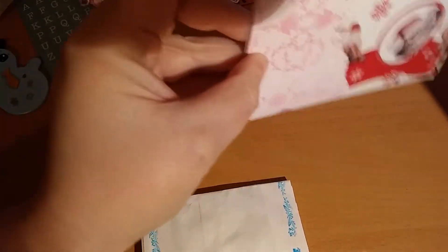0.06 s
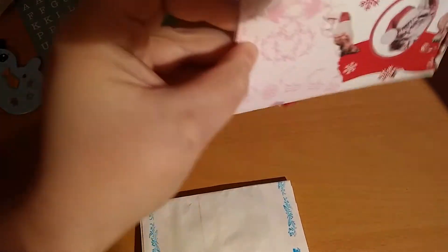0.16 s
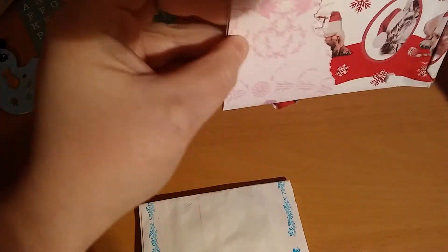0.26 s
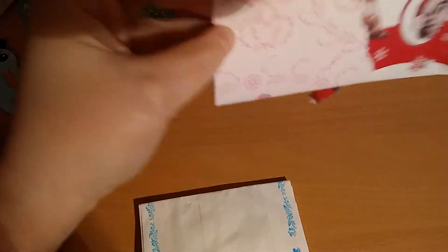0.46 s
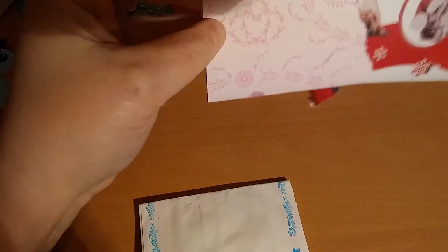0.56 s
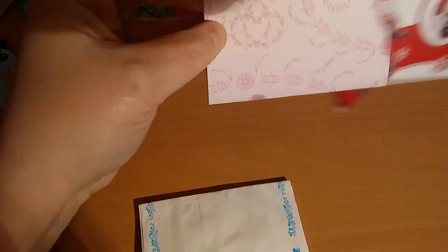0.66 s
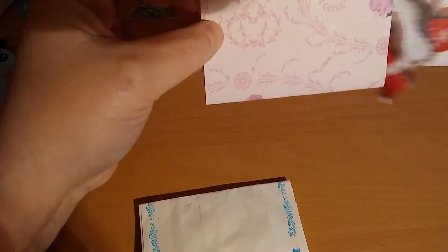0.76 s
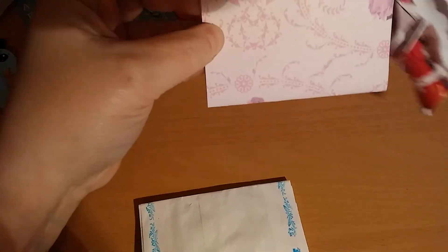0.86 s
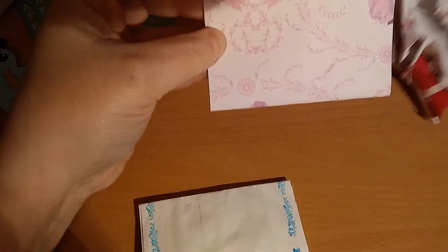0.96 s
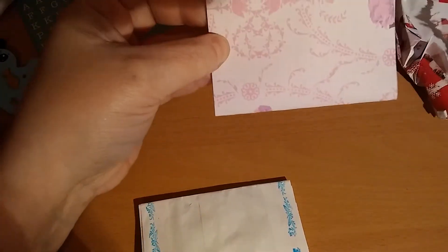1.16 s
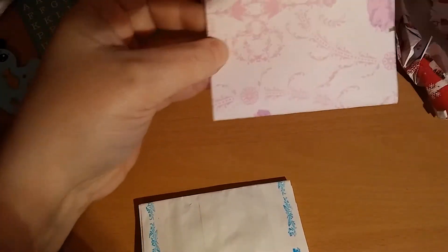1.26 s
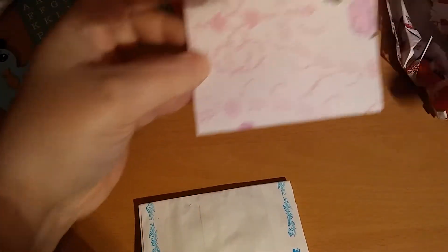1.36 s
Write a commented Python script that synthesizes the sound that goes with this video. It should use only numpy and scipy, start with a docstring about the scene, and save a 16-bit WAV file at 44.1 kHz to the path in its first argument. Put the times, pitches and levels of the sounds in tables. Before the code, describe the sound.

Hands strip wrapping paper from a small card box at a table: a brief crackle, sharp snaps, a longer hissing rustle, then loud cracks with hollow knocks, close to a camera microphone in a quiet room.

```python
"""Paper slides, crackles and rubs a small card box as hands tear the wrapping off, close to a camera microphone.
Clumped random slips, each rattling on in the sheet, are filtered into hiss, crackle and box rubbing.
Creases snap as a crack with a dying volley; hands knock box and table as short decaying sines.
Quiet room noise lies behind; between bursts all sound drops away abruptly."""
import sys
import numpy as np
from scipy import signal
from scipy.io import wavfile
from scipy.ndimage import uniform_filter1d

SR = 44100
rng = np.random.default_rng(int(sys.argv[2]) if len(sys.argv) > 2 else 0)


def transcribe(u):
    """Save the signal u as a 16-bit wav file named by the first command-line argument.

    u: samples, shape (n,) or (channels, n), limited to [-1, 1]; the rate is SR.
    q: integer samples, one column per channel.
    """
    v = np.clip(np.atleast_2d(u).T, -1, 1)
    q = np.round(v * 32767).astype(np.int16)
    wavfile.write(sys.argv[1], SR, q)


N = 61739

# level curves, one list per burst of handling: time_s, hiss_db, crackle_db, rub_db
BURST_CURVES = [
    [(0, -44.5, -34, -64), (.008, -63, -47.5, -48), (.022, -66, -51, -56), (.034, -68.5, -54, -52.5),
     (.047, -67, -57.5, -60)],
    [(0.092, -80.5, -52, -51.5), (0.106, -57, -60.5, -59), (0.116, -63, -49, -51.5)],
    [(.192, -73, -62, -55.5), (.21, -62, -46, -46), (.226, -58, -49, -46.5), (.236, -63, -52.5, -50),
     (.248, -61, -49, -44.5), (.258, -68, -56, -52), (.273, -68, -59, -54)],
    [(0.285, -72, -62, -67), (0.295, -76, -73, -56), (0.301, -73, -80, -73), (0.315, -57, -61, -62),
     (0.321, -57, -53.5, -60)],
    [(0.342, -54.5, -56.5, -65), (0.366, -50.5, -52, -54), (0.384, -49, -49, -59), (0.397, -40, -41, -61),
     (0.403, -38, -40.5, -55), (0.412, -44, -40.5, -58.5), (0.454, -39.5, -42.5, -54.5),
     (0.474, -40, -37.5, -52.5), (0.492, -39.5, -45.5, -59.5), (0.514, -44.5, -43, -62),
     (0.53, -51, -50.5, -65), (0.574, -73, -64.5, -57.5), (0.596, -47, -48.5, -48),
     (0.612, -50, -48.5, -49.5), (0.65, -63, -52.5, -47), (0.656, -54, -52, -50), (0.666, -49, -49, -51),
     (0.678, -45, -46.5, -56), (0.698, -43.5, -47, -57), (0.708, -43.5, -48.5, -48.5),
     (0.72, -43, -46.5, -51.5), (0.74, -39, -43, -47.5), (0.77, -43, -47, -52), (0.797, -42.5, -47.5, -54),
     (0.814, -46, -43.5, -61.5), (0.824, -45, -42, -55.5), (0.838, -58, -54.5, -52.5),
     (0.878, -57.5, -51, -67.5), (0.892, -59, -57.5, -74)],
    [(1.018, -67, -73, -59.5), (1.026, -37.5, -53, -70), (1.034, -63, -61.5, -63),
     (1.04, -46.5, -63, -42.5), (1.052, -59.5, -46.5, -46.5), (1.069, -49, -48, -49.5),
     (1.08, -56, -54.5, -47.5), (1.092, -47, -55, -55), (1.103, -61.5, -53, -51), (1.112, -43.5, -64, -57),
     (1.122, -58, -56, -58), (1.14, -60.5, -37.5, -42.5), (1.165, -62.5, -55, -45.5),
     (1.194, -63, -51, -63)],
    [(1.314, -74, -88, -71.5), (1.335, -94, -82, -82), (1.34, -85, -84, -79), (1.346, -81, -74.5, -71),
     (1.355, -72, -76, -76)],
]


def gain_of(db):
    """Amplitude factor of a level in dB."""
    return 10 ** (np.asarray(db) / 20)


def evened(x):
    """Scale to unit RMS."""
    return x / np.sqrt(np.mean(x ** 2) + 1e-20)


def colour(x, points):
    """Causal minimum-phase filter through the given (hz, db) points."""
    hz, db = np.transpose(points)
    bin_hz = abs(np.fft.fftfreq(4096, 1 / SR))
    bin_db = np.interp(np.log(bin_hz + 1), np.log(hz + 1), db)
    log_gain = bin_db * np.log(10) / 20
    spectrum = np.exp(np.conj(signal.hilbert(log_gain)))
    taps = np.fft.ifft(spectrum).real[:2048]
    return signal.oaconvolve(x, taps)[:len(x)]


def ring(x, hz, width_hz):
    """One two-pole resonance of about unit peak gain."""
    r = np.exp(-np.pi * width_hz / SR)
    edge = (1 - r * r) / 2
    return signal.lfilter([edge, 0, -edge], [1, -2 * r * np.cos(2 * np.pi * hz / SR), r * r], x)


def handling():
    """Paper slides with a hiss, crackles, and rubs the box, each slip train on its own level curve."""
    # sliding spectrum: hz, level_db
    hiss_spectrum = [(500, -52), (2500, -27.5), (4200, -9), (5450, -1), (6800, -4), (8000, -19),
                     (10300, -24), (11800, -37), (16000, -46)]
    # crackle spectrum: hz, level_db
    crackle_spectrum = [(300, -24.5), (700, -13), (1050, -9.5), (1460, -7.5), (1900, -3), (2230, 4.5),
                        (2500, -1.5), (3400, 1.5), (4400, 0), (7000, -18.5), (16000, -64.5)]
    hiss = colour(grains(14000, spread_db=2.2, clump_db=1.3, clump_s=0.0012), hiss_spectrum)
    crackle = colour(grains(6000, spread_db=2.5, clump_db=1.4, clump_s=0.0027), crackle_spectrum)
    rub = box(grains(900, spread_db=1.0, clump_db=2.2, clump_s=0.004))

    t = np.arange(N) / SR
    time_s, *levels_db = np.concatenate(BURST_CURVES).T
    total = np.zeros(N)
    for voice, level_db in zip([hiss, crackle, rub], levels_db):
        total += evened(voice) * gain_of(np.interp(t, time_s, level_db))
    return total


def grains(per_s, spread_db, clump_db, clump_s):
    """Tiny slips of uneven size come in clumps; eight patches of sheet each rattle on in their own way."""
    rattle_t60_s, rattle_db = 0.027, 1  # rattle energy relative to its slip
    span = max(round(clump_s * SR), 2)
    slow = uniform_filter1d(uniform_filter1d(rng.standard_normal(N), span), span)
    size = np.minimum(rng.exponential(1, N), 4)
    size_gain = gain_of(spread_db * size + clump_db * evened(slow))
    happens = rng.random(N) < per_s / SR
    slips = happens * rng.standard_normal(N) * size_gain

    # the slipping patch is drawn anew every 64 samples
    patch = rng.integers(0, 8, N // 64 + 1)[np.arange(N) // 64]
    t = np.arange(1500) / SR
    rattles = rng.standard_normal((8, len(t))) * gain_of(-60 * t / rattle_t60_s)
    rattles *= gain_of(rattle_db) / np.linalg.norm(rattles, axis=1, keepdims=True)
    total = slips.copy()
    for k, rattle in enumerate(rattles):
        total += signal.oaconvolve(slips * (patch == k), rattle)[:N]
    return total


def box(x):
    """The hollow card box rings low: parallel modes of alternating sign, then an overall spectrum."""
    # resonances of the box: pitch_hz, width_hz, level_db
    box_modes = [(85, 20, -18.5), (192.4, 60, -1.5), (300, 77.4, -6), (420, 48, 0), (704, 44, -9),
                 (990, 305, -9)]
    # overall spectrum of the box: hz, level_db
    box_spectrum = [(20, -28.5), (70, 2), (150, -0.5), (1200, 1), (3000, -18), (16000, -76)]
    total = np.zeros(len(x))
    for k, (hz, width_hz, db) in enumerate(box_modes):
        total += (-1) ** k * gain_of(db) * ring(x, hz, width_hz)
    return colour(total, box_spectrum)


def snap(peak_db, hz, broad_db, hold_s, t60_s):
    """One sharp crack and a dying volley of smaller ones ring a patch of sheet and sound broadly."""
    # broad crack spectrum: hz, level_db
    crack_spectrum = [(290, -28), (500, -10), (1420, -8), (2260, -1), (2850, -6.5), (3750, -6),
                      (6330, -10.5), (7420, -28), (16000, -55.5)]
    first_db = 18.5  # first crack over the volley
    volley_rise_s, onset_s = 0.00031, 0.0002
    width_hz = 0.38 * hz
    t = np.arange(3000) / SR
    first = 1.0 * (t == 0)

    decay = gain_of(-60 * np.maximum(t - hold_s, 0) / t60_s)
    shape = np.minimum(t / volley_rise_s, 1) * decay
    volley = gain_of(first_db) * first + shape * rng.standard_normal(len(t))

    patch = ring(ring(first, hz, width_hz), hz, width_hz)
    voice = evened(patch) + gain_of(broad_db) * evened(colour(first, crack_spectrum))
    voice *= np.minimum((t + 1 / SR) / onset_s, 1)
    crack = signal.oaconvolve(volley, voice)[:len(t)]
    return gain_of(peak_db) * crack / abs(crack).max()


def bump(level_db, hz, cycles):
    """A soft push on box or table: a sine swells over one cycle, then falls 20 dB in the given cycles."""
    turns = np.arange(3000) / SR * hz
    decay = gain_of(-20 * np.maximum(turns - 1, 0) / cycles)
    swing = np.sin(2 * np.pi * turns) * np.minimum(turns, 1) * decay
    return gain_of(level_db) * swing


def room():
    """Coloured noise of the quiet room, plus a constant negative offset."""
    # room spectrum: hz, level_db
    room_spectrum = [(30, -23.5), (70, -2.5), (250, -3.5), (650, -11), (960, -8.5), (1250, -13.5),
                     (3140, -14.5), (5500, -17.5), (8300, -27), (16000, -27)]
    room_db, offset_db = -66, -70.5
    noise = evened(colour(rng.standard_normal(N), room_spectrum))
    return gain_of(room_db) * noise - gain_of(offset_db)


def presence():
    """Gains for room and handling: full in a burst, swelling in before it and cut short after it."""
    swell_db_per_s, cut_db_per_s = 1689, 8992
    room_floor_db = -9  # the room drops no further; handling has no floor
    t = np.arange(N) / SR
    db = np.full(N, -np.inf)
    for rows in BURST_CURVES:
        early_s = np.maximum(rows[0][0] - t, 0)
        late_s = np.maximum(t - rows[-1][0], 0)
        db = np.maximum(db, -swell_db_per_s * early_s - cut_db_per_s * late_s)
    return gain_of(np.maximum(db, room_floor_db)), gain_of(db)


def scene():
    """Snaps, bumps and handling under one burst gain, the room under its own."""
    # creases snapping, before the burst gain: start_s, peak_db, pitch_hz, broad_db (re patch ring), hold_s, t60_s
    snap_events = [(.012, -30, 2658, 13, 0.0065, 0.015), (0.03, -42, 6640, 2, 0.00072, 0.011),
                   (0.099, -39, 2930, 4, 0.00089, 0.033), (0.1965, -28.5, 3120, 7, 0.0023, 0.014),
                   (0.2045, -19, 5000, 1.5, 0.00091, 0.0099), (0.2067, -23, 2900, 10, 0.0018, 0.029),
                   (0.2128, -23.5, 1520, 9, 0.0016, .012), (0.2197, -18.5, 4850, 2.5, 0.0011, 0.012),
                   (0.261, -39.5, 1800, -3.5, 0.004, 0.028), (0.31, -48, 2170, -17, 0.0072, 0.018),
                   (0.348, -44, 2220, -8, .0012, .025), (0.368, -40.5, 2310, -7, 0.0017, 0.027),
                   (0.3993, -22, 2660, -2.5, 0.0016, 0.019), (0.417, -26.5, 4500, -10, 0.00057, 0.008),
                   (0.435, -31, 4060, -21, 0.002, 0.021), (.469, -29.5, 3100, -26, 0.00276, 0.0091),
                   (0.544, -39.5, 4070, 4, 0.0011, 0.013), (0.581, -57, 3000, 3, .0012, .02),
                   (0.593, -29.5, 2970, -19.5, 0.0066, 0.065), (0.621, -32.5, 2750, -22, 0.0017, 0.021),
                   (0.6349, -33.5, 1340, 3.5, 0.0021, 0.016), (0.6448, -31, 915, -0.5, 0.00074, 0.02),
                   (0.6654, -28.5, 2230, -10, 0.00031, 0.012), (0.7112, -24.5, 3040, -2, .0012, 0.015),
                   (0.7166, -21, 4850, -10.5, 0.00165, 0.013), (0.7926, -34, 4900, -11, 0.0044, .02),
                   (.8232, -25.5, 5166, -9.5, 0.00043, 0.0124), (0.8235, -36, 8810, -10.5, 0.00061, 0.0151),
                   (1.0413, -27, 1270, -8, 0.0011, 0.01), (1.0428, -14, 2767, 5, 0.0013, 0.021),
                   (1.1241, -17, 2800, -14, 0.0013, 0.012), (1.1243, -31, 7540, -20.5, 0.0026, 0.0116),
                   (1.1245, -38.5, 10600, -17, 0.0012, 0.01), (1.1267, -14.5, 2450, -15.5, 0.00083, 0.013),
                   (1.1289, -20.5, 4130, -6.5, 0.0012, 0.01), (1.1303, -17.5, 3742, -26, 0.0007, 0.017),
                   (1.1348, -21, 4470, 2.5, 0.0014, 0.02937), (1.1537, -29.5, 4720, 2, 0.0019, 0.051),
                   (1.191, -45, 4650, -2, 0.00124, 0.0105)]
    # knocks of the hands, before the burst gain: start_s, level_db, pitch_hz, cycles (per 20 dB fall)
    bump_events = [(0.011, -57, 185, 8), (0.199, -56.5, 65.4, 4.5), (0.46, -50.5, 182, 4),
                   (0.506, -56, 151, 2.5), (0.736, -56.5, 76, 0.5), (0.097, -48.5, 350, 1.5),
                   (0.203, -34.5, 420, 6), (0.209, -36, 185, 2), (.243, -37.5, 420, 4.5),
                   (0.262, -39.5, 523, 2.5), (0.377, -46.5, 85, 2), (0.4, -41, 785, 9),
                   (0.451, -52, 84, 2.5), (0.554, -56, 85, 1.5), (.595, -38, 400, 3),
                   (0.604, -45.5, 193, 2), (0.663, -38.5, 420, 2.5), (.71, -37.5, 431, 7),
                   (0.711, -44.5, 138, 1), (1.043, -33, 450, 2), (1.044, -35, 200, 0.5),
                   (1.043, -32, 900, 6), (1.135, -30, 400, 2), (1.136, -34, 240, 2), (1.163, -43.5, 85, 3),
                   (1.313, -53.5, 152, 2), (1.325, -51.5, 90, 2), (1.349, -46.5, 300, 1.5)]
    hits = np.zeros(N + 3000)
    for make, events in [(snap, snap_events), (bump, bump_events)]:
        for start_s, *settings in events:
            hits[round(start_s * SR):][:3000] += make(*settings)
    room_gain, handling_gain = presence()
    mix = room_gain * room() + handling_gain * (hits[:N] + handling())
    return mix[None]


def record(dry):
    """Faint hiss of the microphone, then the band limit."""
    hiss_db, edge_hz = -95.5, 15900
    hissy = dry + gain_of(hiss_db) * rng.standard_normal(dry.shape)
    lowpass = signal.firwin(511, edge_hz, window=("kaiser", 9), fs=SR)
    return signal.oaconvolve(hissy, lowpass[None], "same")


dry = scene()
out = record(dry)
transcribe(out)
```